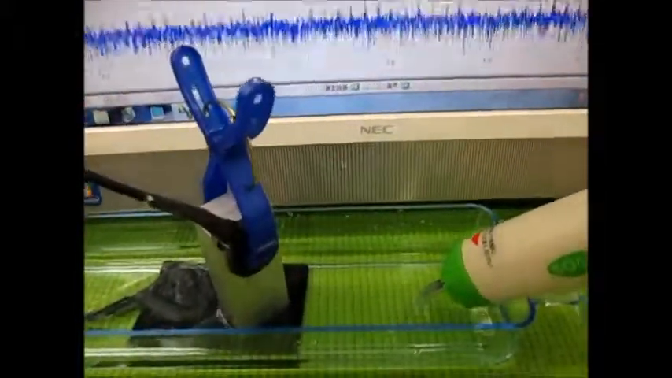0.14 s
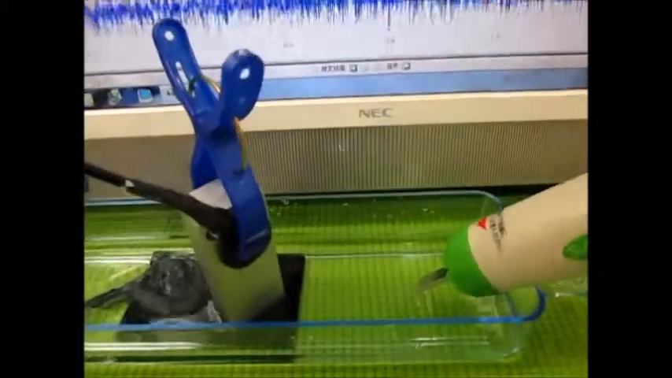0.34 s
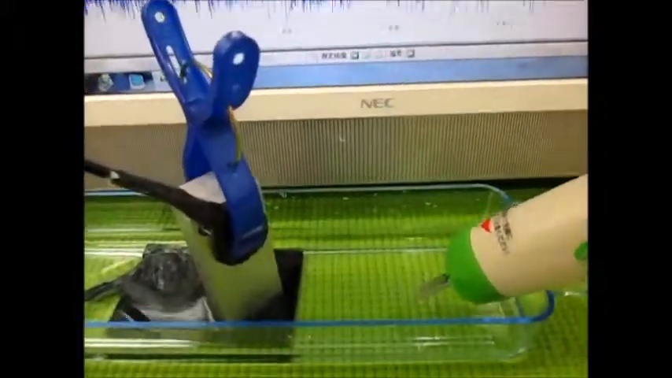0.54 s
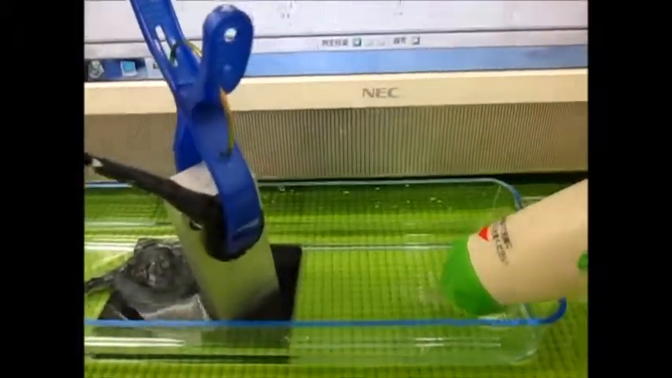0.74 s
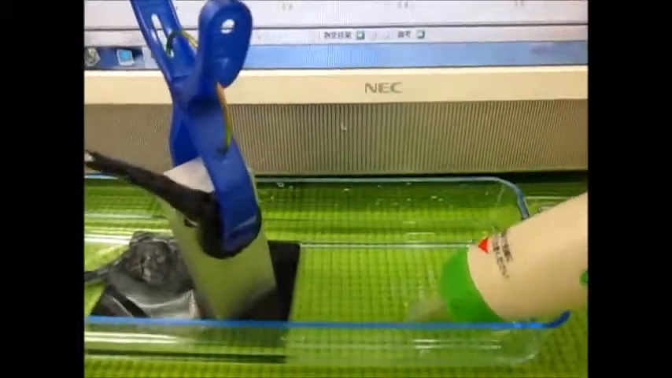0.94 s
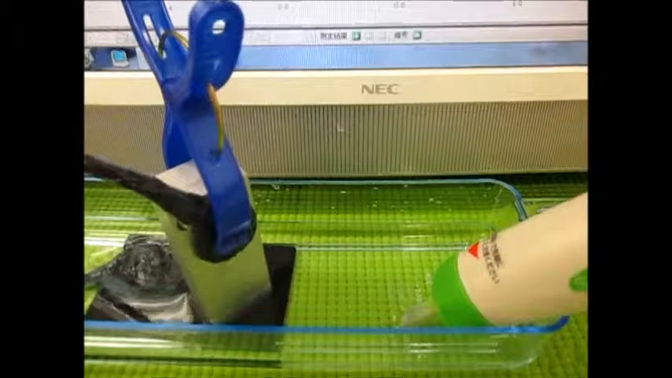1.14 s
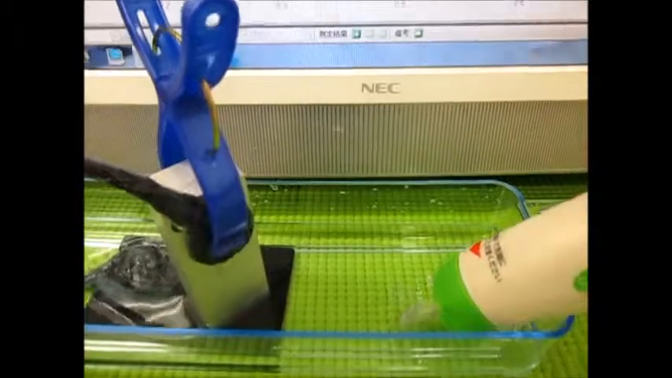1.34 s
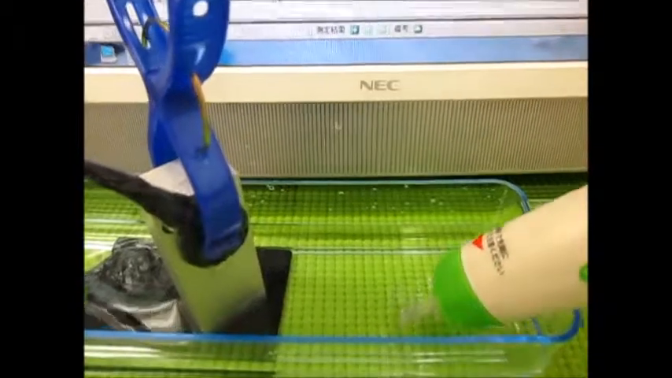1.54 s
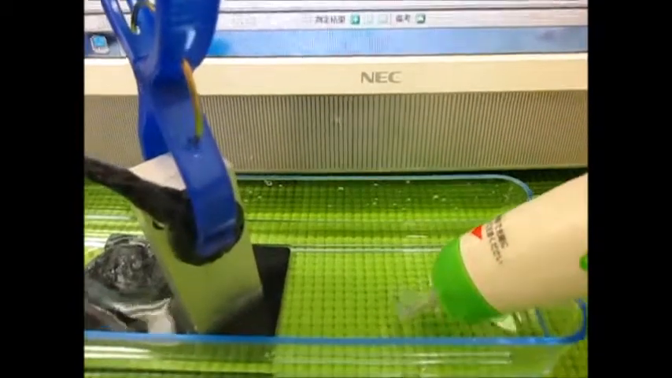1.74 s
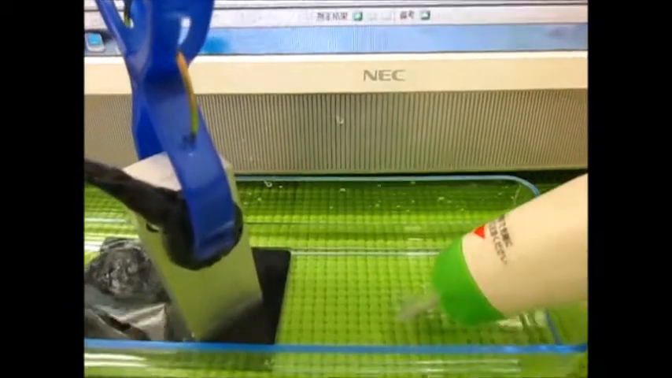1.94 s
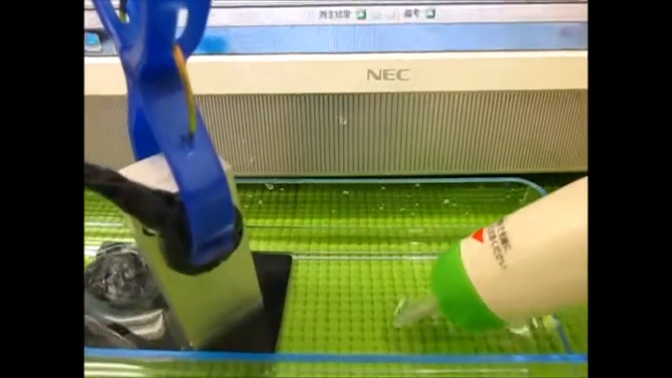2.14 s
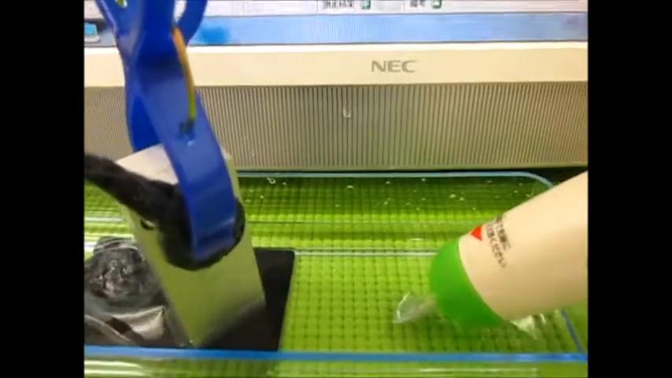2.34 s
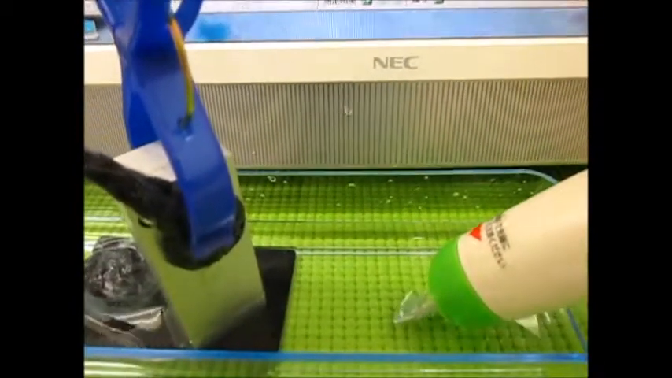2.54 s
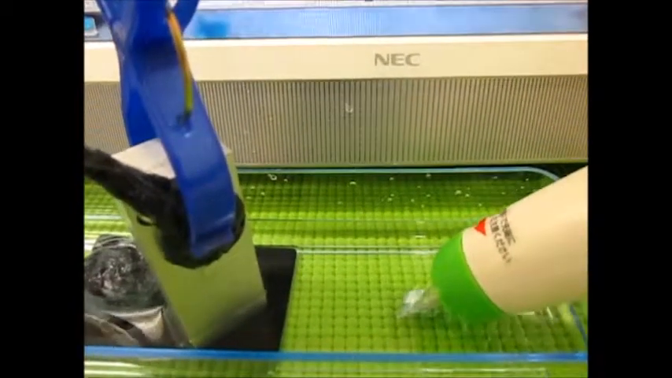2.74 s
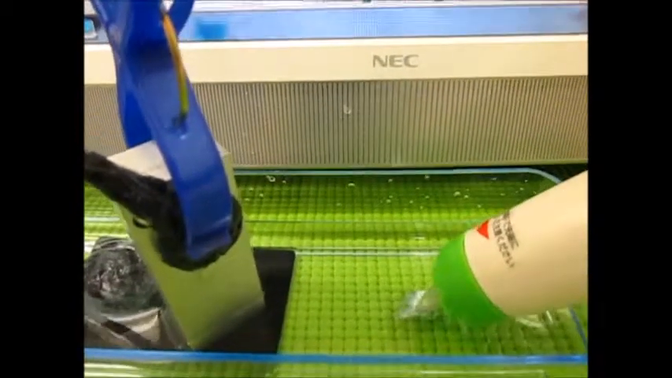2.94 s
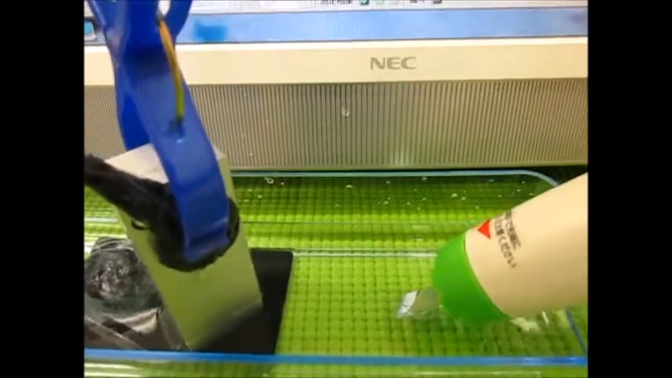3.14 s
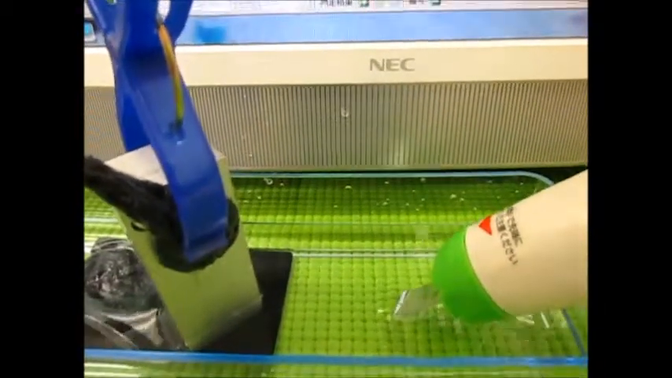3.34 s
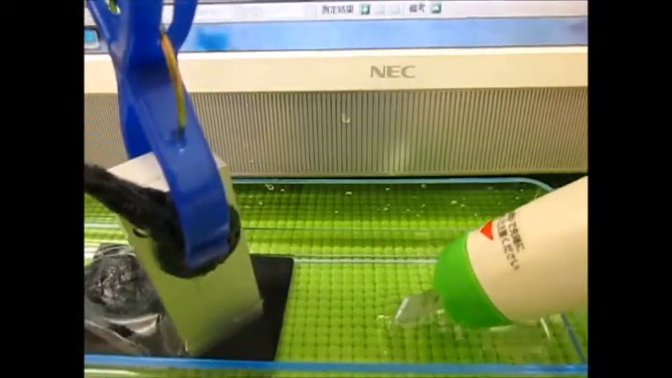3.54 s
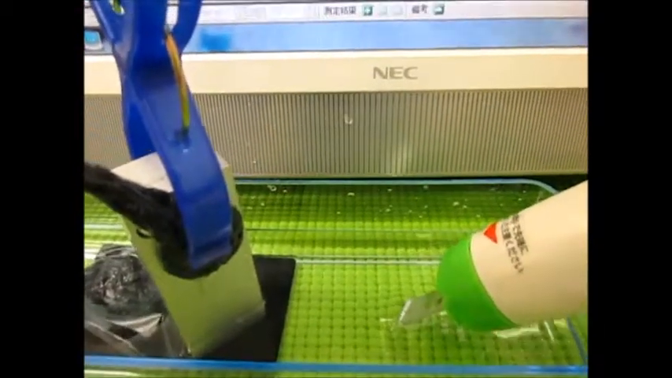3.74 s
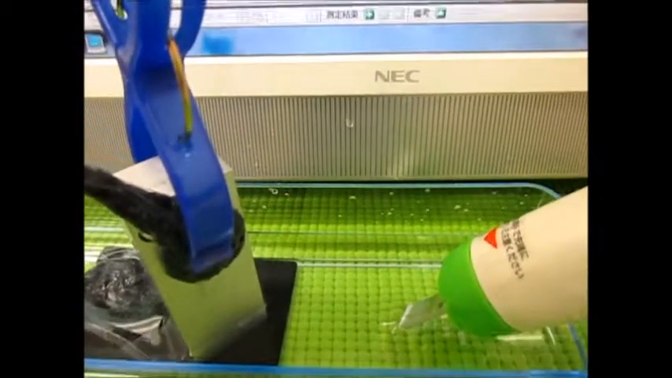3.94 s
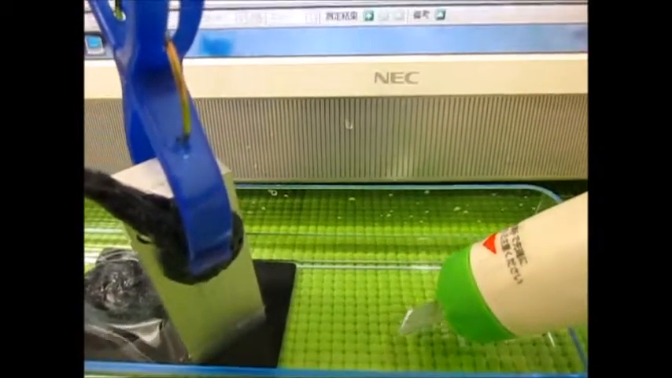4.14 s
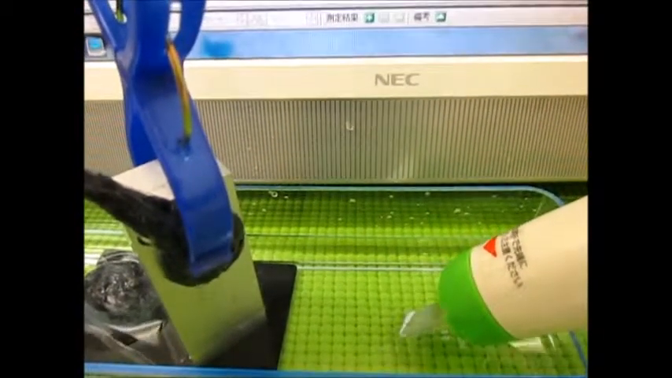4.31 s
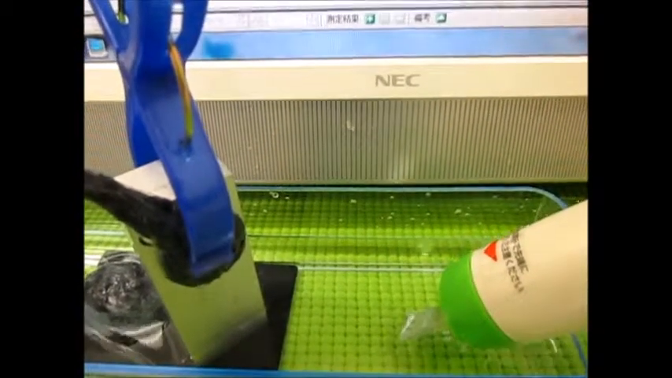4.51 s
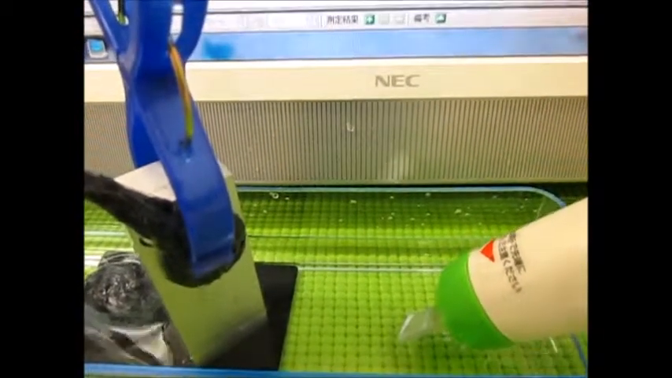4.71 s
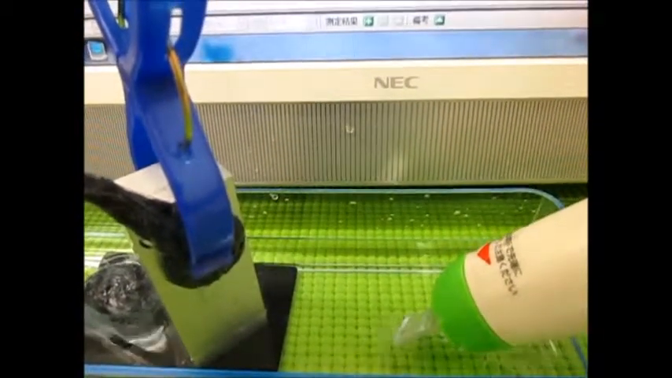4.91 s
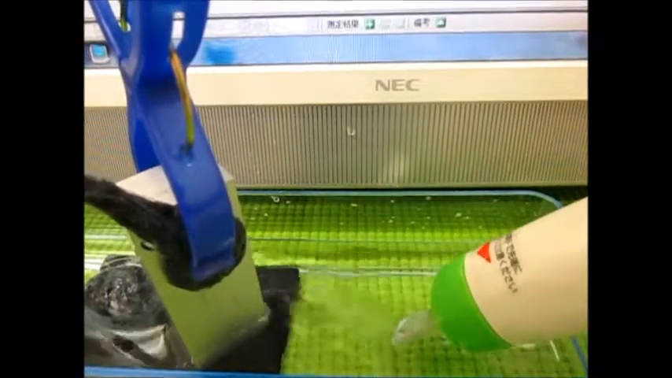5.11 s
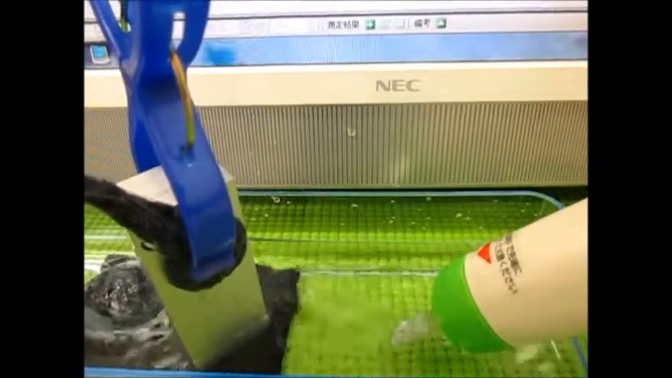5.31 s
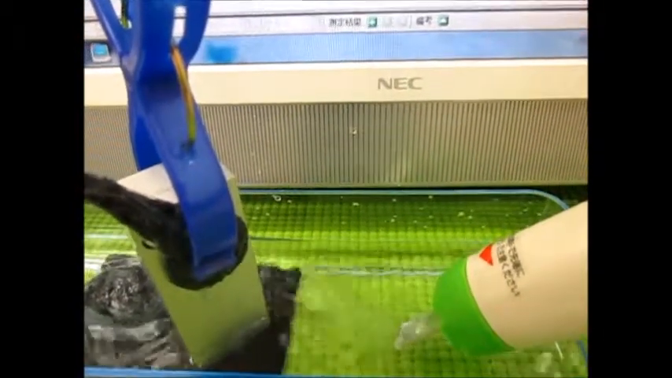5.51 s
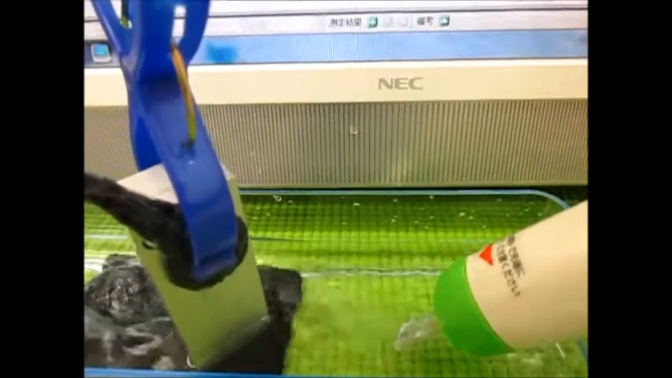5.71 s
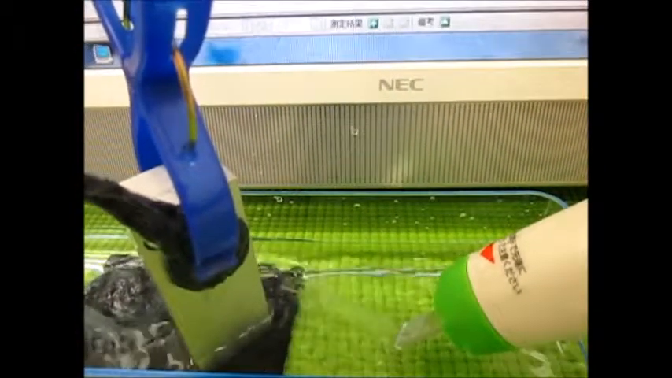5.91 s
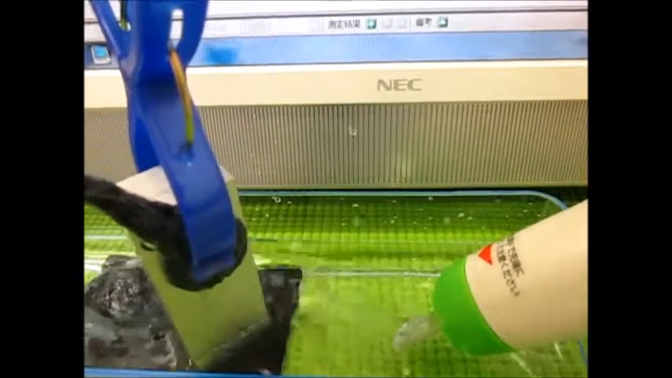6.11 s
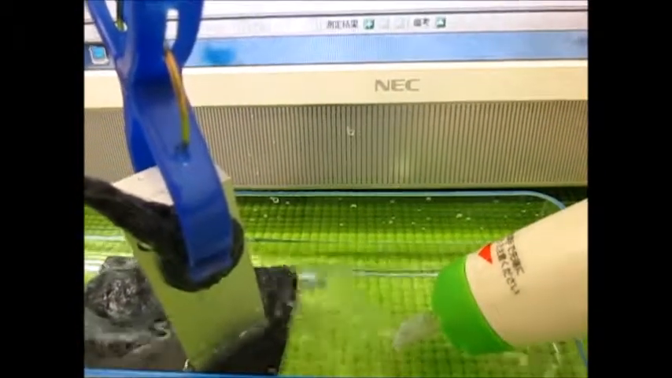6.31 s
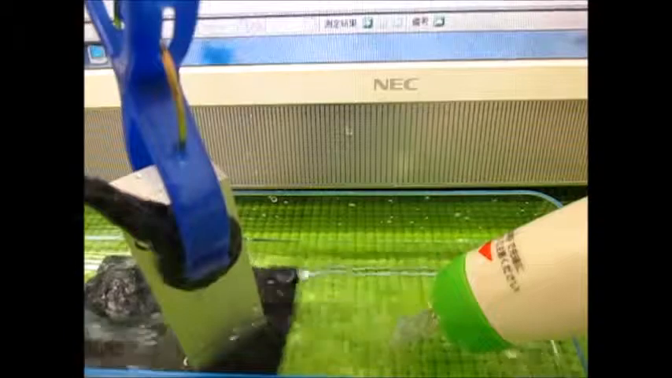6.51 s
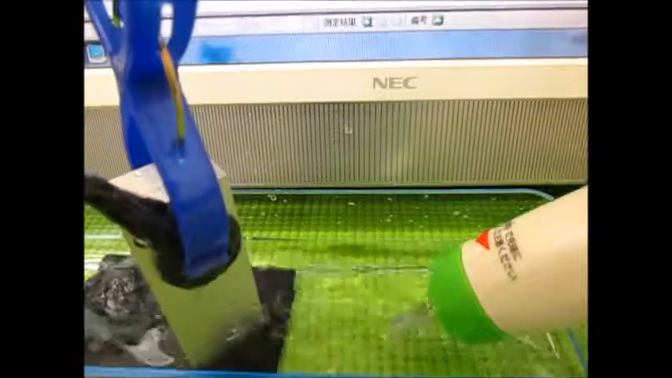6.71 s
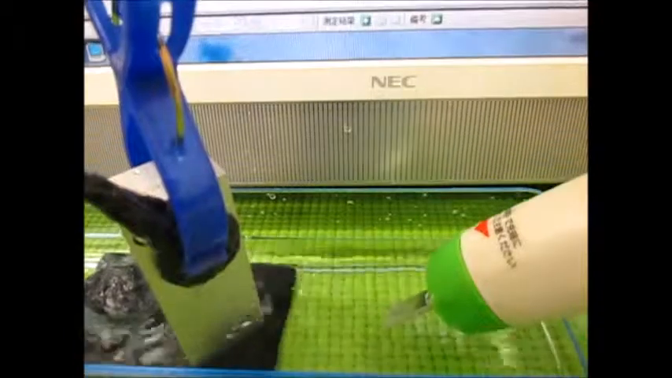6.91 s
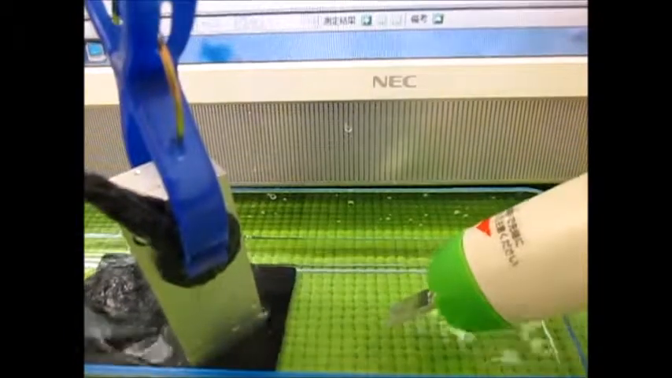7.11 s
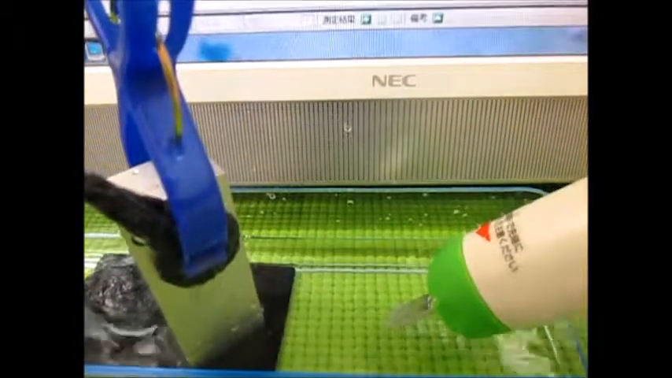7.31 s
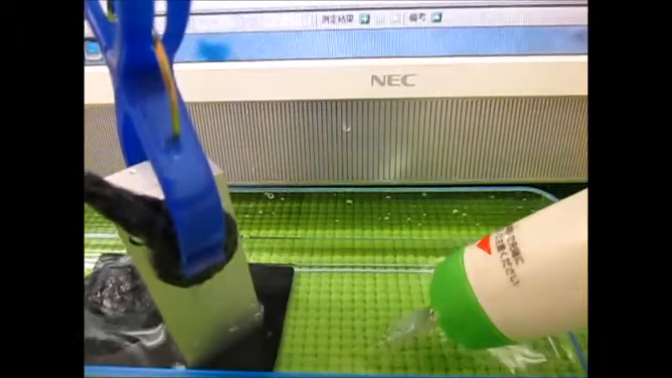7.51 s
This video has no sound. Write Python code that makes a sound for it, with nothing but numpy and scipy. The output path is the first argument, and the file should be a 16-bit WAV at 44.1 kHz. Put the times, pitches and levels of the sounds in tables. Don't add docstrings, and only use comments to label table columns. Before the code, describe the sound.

In a small hard lab, soft ventilation rumble and a wavering low hum run throughout. Dull knocks come from a bench across the room, with one loud plastic snap close by. Fingers rustle and creak on a plastic grip near the microphone. A switch clicks and a harsh, bright, bubbly hiss bursts into a shallow water tray, weakens after a second, and stops abruptly with another click.

```python
import sys
import numpy as np
from scipy import signal
from scipy.fft import rfft, irfft, dct, next_fast_len
from scipy.io import wavfile
from scipy.ndimage import uniform_filter1d

SR = 44100
rng = np.random.default_rng(int(sys.argv[2]) if len(sys.argv) > 2 else 0)


def ratio(d):
    e = np.asarray(d, float) / 20
    return 10 ** e


def digitize_waveform(pressure):
    field = np.atleast_2d(pressure).T
    bounded = np.clip(field, -1, 1)
    quanta = np.round(bounded * 32767).astype(np.int16)
    wavfile.write(sys.argv[1], SR, quanta)


N = 333396
T = np.arange(N) / SR


def unit(x):
    return x / np.sqrt(np.mean(x ** 2))


def curve(rows, order=1):
    rows = np.array(rows)
    return np.interp(T, rows[:, 0], rows[:, order], left=-150, right=-150)


def band(x, hz, width_hz):
    return signal.lfilter(*signal.iirpeak(min(hz, .45 * SR), hz / width_hz, fs=SR), x)


def coloured(shape):
    hz, db = np.transpose(shape)
    f = np.maximum(np.arange(N // 2 + 1) * SR / N, 1)
    gain = ratio(np.interp(np.log(f), np.log(hz), db))
    return irfft(rfft(rng.standard_normal(N)) * gain, N)


def walk(rate):
    k = max(int(SR / rate), 1)
    held = np.repeat(rng.standard_normal(N // k + 1), k)
    return unit(uniform_filter1d(uniform_filter1d(held, k), k)[:N])


def ring(hz, t60, rise_s=0.00033):
    t = np.arange(SR // 10) / SR
    return (1 - np.exp(-t / rise_s)) * ratio(-60 * t / t60) * np.sin(2 * np.pi * hz * t)


def burst(t60):
    return rng.standard_normal(SR // 10) * ratio(-60 * np.arange(SR // 10) / SR / t60)


def add(out, s, hit, db):
    i = int(s * SR)
    out[i:i + len(hit)] += ratio(db) * hit / np.abs(hit).max()


# frequency in Hz, density in dB per Hz.
AIR = [(12, -51), (20, -0.5), (41, -6), (81, -6.5), (123, -3.5), (276, -4.5), (317, -5), (355, -9.5),
       (469, -12), (554, -11.5), (603, -14.5), (1080, -18), (1510, -23), (2450, -27), (3300, -33),
       (15800, -52)]
# time in seconds, level in dB.
HUM = [(0.0, -61), (1.2, -54), (1.47, -62), (1.68, -51.5), (3.05, -49), (4.2, -49), (5.6, -52), (5.9, -54),
       (7.56, -57.5)]


def lab():
    air = coloured(AIR)
    mids = signal.butter(4, [150, 900], "band", fs=SR, output="sos")
    air /= np.std(signal.sosfilt(mids, air))
    bass = band(band(rng.standard_normal(N), 30, 30), 30, 30)
    rumble = ratio(-63.5 + 5.1 * walk(3.9)) * unit(bass)
    hum = np.sqrt(2) * np.sin(2 * np.pi * 120.5 * T + .8 * walk(12))
    hum = ratio(curve(HUM) - 1.5 + 2.6 * walk(14)) * hum
    return ratio(-47.5 + 0.72 * walk(10)) * air + rumble + hum


ECHO_S, ECHO_DB = .0105, -12

# start in seconds, peak in dB, low mode in Hz, relative level of the upper modes in dB.
KNOCKS = [
    (0.159, -21, 700, -18),
    (0.324, -28.5, 444, -20),
    (0.985, -30, 490, -28),
    (1.456, -30, 474, -23.5),
    (1.883, -40, 697, -24),
    (2.064, -23, 409, -21),
    (2.426, -27.5, 405, -23),
    (2.738, -25.5, 415, -26),
]
# frequency in Hz, level in dB, 60 dB decay in seconds.
BENCH = [(436, 10, 0.026), (580, -1, 0.014), (687, 14, 0.013), (940, -18, 0.022), (1260, -17, 0.024),
         (1420, -5, 0.034), (1664, -5, 0.039), (2050, -10, 0.024), (2720, -6, 0.0053)]


def knocks():
    thud_lag_s, tick_lead_s = .0016, .0007
    out = np.zeros(N)
    chance = rng.standard_normal((len(KNOCKS), len(BENCH)))
    for (s, db, hz, upper_db), own in zip(KNOCKS, chance):
        hit = 0.49 * ring(hz, 0.034, 0.0037) + ratio(upper_db - 2.5) * band(burst(0.028), 3000, 5000)
        for (f, g_db, t60), c in zip(BENCH, own):
            mode = ring(f * (1 + 0.056 * c), t60, 0.62 / f)
            mode = np.roll(mode, int(thud_lag_s * SR) * (f < 1000))
            hit += ratio(g_db + 1.5 * c + (upper_db + 19.5) * (f > 1000)) * mode
        add(out, s - tick_lead_s, hit, db)
        add(out, s + ECHO_S, hit, db + ECHO_DB)
    return out


# start in seconds, peak in dB, crack level relative in dB.
CLICKS = [
    (1.185, -33.5, -30),
    (1.2095, -8.5, -29),
    (4.3687, -20.5, -23),
    (4.9358, -8.5, -22),
    (6.7483, -15.5, -30),
]
# frequency in Hz, level in dB, 60 dB decay in seconds.
SHELL = [
    [(1040, -2, 0.056), (1720, -3, 0.039), (2680, -15, .02), (6300, -20, .012)],
    [(2440, 1.5, 0.009), (2880, 2.5, 0.0076), (3460, 5, 0.007), (3760, -3, 0.0067), (4460, -11.5, 0.0093),
     (5070, -14, 0.013), (6500, 7.5, 0.0023), (7680, -10, 0.0098)],
    [(496, -2, 0.016), (1040, -8, 0.017), (1750, 2, 0.015), (2270, -4, .008), (2950, -4, 0.0091),
     (3550, -11, 0.0087), (4320, -1, 0.0096), (6000, -16, 0.01), (11400, -30, .012)],
    [(1650, -8.5, 0.0079), (2600, -4.5, 0.0095), (3450, -4, 0.0117), (4250, -6, 0.0064), (4960, -6.5, .012),
     (6400, -12.5, 0.0078)],
    [(406, 2, 0.0097), (1080, -1.5, 0.011), (1620, 0.5, 0.013), (2230, -2, 0.012), (3000, -6, 0.008),
     (4250, 1.5, 0.0091)],
]
# start in seconds, peak in dB, centre in Hz, width in Hz.
TICKS = [
    (1.2745, -43, 11000, 9000),
    (2.618, -42.5, 12400, 4500),
    (3.428, -51, 11000, 12000),
    (3.435, -50, 11000, 6000),
    (3.458, -42.5, 10000, 12000),
    (3.5, -44.5, 11000, 11000),
    (3.575, -49, 7050, 6950),
    (4.3464, -55, 12500, 8000),
    (4.452, -54, 4670, 4000),
]


def clicks():
    out = np.zeros(N)
    for (s, db, crack_db), modes in zip(CLICKS, SHELL):
        hit = 0
        for k, (hz, g_db, t60) in enumerate(modes):
            hit = hit + (-1) ** k * ratio(g_db) * ring(hz, 0.65 * t60, 0.00059)
        chatter = np.convolve(hit, burst(0.019)[:300])[:len(hit)] / 4
        add(out, s, hit + 0.25 * chatter, db)
        echo = np.convolve(hit, burst(0.15)[:3600])[:SR // 10]
        add(out, s + ECHO_S, echo, db - 28.5)
        crack = burst(0.013) + .12 * burst(.07)
        add(out, s, band(band(crack, 9300, 10000), 9500, 9000), db + crack_db)
    for s, db, hz, width_hz in TICKS:
        add(out, s, band(band(burst(0.028), hz, width_hz), hz, width_hz), db)
    add(out, TICKS[0][0], ring(14100, .035), -51)
    return out


def stroke(s, length_s, edge_s):
    return np.clip(np.minimum(T - s, s + length_s - T) / edge_s + .5, 0, 1)


# start in seconds, length in seconds, peak in dB, centre in Hz, width in Hz.
SLIDES = [
    (2.1, 1.33, -74, 10400, 9000),
    (2.6, 0.36, -82, 9900, 400),
    (3.3, 1.28, -73, 7600, 6000),
    (4.38, 0.17, -61.5, 4400, 2800),
]
# start in seconds, length in seconds, level in dB.
CREAKS = [
    (3.523, 0.049, -65),
    (3.572, .04, -59),
    (3.635, 0.083, -62.5),
    (3.72, .19, -61.5),
    (3.94, .033, -63),
    (4.044, 0.032, -63),
]
# frequency in Hz, width in Hz, level in dB.
GRIP = [(4600, 300, -9), (6710, 150, -5), (9570, 170, -1), (11600, 200, -8), (12300, 200, -3),
        (14300, 280, 1)]


def hand():
    chance = 300 / SR * ratio(5 * walk(40))
    slips = (rng.random(N) < chance) * ratio(1.5 * rng.standard_normal(N))
    slips = slips + .05 * rng.standard_normal(N)
    creak = sum(ratio(db) * band(slips, hz, w) for hz, w, db in GRIP)
    creak = creak + ratio(-12) * band(slips, 10000, 11000)
    out = sum(ratio(db) * stroke(s, length_s, .008) for s, length_s, db in CREAKS) * unit(creak)
    for s, length_s, db, hz, width_hz in SLIDES:
        swell = np.sin(np.pi * np.clip((T - s) / length_s, 0, 1)) ** 2
        rustle = band(band(rng.standard_normal(N), hz, width_hz), hz, width_hz)
        out += swell * ratio(db + 2.4 * walk(50)) * unit(rustle)
    return out


# centre in seconds, half length in seconds, depth in dB.
LULLS = [
    (5.37, 0.13, 2.5),
    (5.655, 0.1, 2),
    (5.875, 0.025, 0),
    (6.17, 0.28, 3),
    (6.585, 0.029, 6),
]


def lulls_db():
    return sum(db * np.exp(-((T - s) / half_s) ** 2) for s, half_s, db in LULLS)


SAG_FROM_S = 6.08


def flow():
    on_s, off_s, bite_s = 5.004, 6.7402, 0.0042
    since = np.maximum(T - on_s, 0)
    db = -15.5 - 7 * np.maximum(T - SAG_FROM_S, 0) - lulls_db()
    db -= 2500 * np.maximum(T - off_s, 0)
    return ratio(db + .8) * (T > on_s) * (1 + .3 * np.exp(-since / bite_s))


# frequency in Hz, density in dB per Hz.
SPLASH = [(500, -23), (1800.0, -21.5), (2770.0, -26.5), (4270.0, -16), (6580.0, -4), (10130.0, -0.5),
          (15600.0, -4)]
# frequency in Hz, width in Hz, gain in dB.
HORN = [(2670.0, 180.0, 11.8), (3010.0, 230.0, -5.6), (3300.0, 890.0, 12.7), (3720.0, 130.0, -9.9),
        (4720.0, 760.0, 3.7), (5170.0, 260.0, -10.0), (5700.0, 160.0, 6.6), (6190.0, 380.0, -11.1),
        (6430.0, 330.0, 8.0), (7050.0, 250.0, -5.0), (7720.0, 480.0, -6.2), (8200.0, 100.0, 3.7),
        (9020.0, 470.0, -14.0), (9390.0, 300.0, 6.5), (10700.0, 900.0, 7.7), (11110.0, 290.0, -3.3),
        (11590.0, 720.0, 5.8), (12020.0, 220.0, -6.8), (12230.0, 900.0, 10.0), (12810.0, 250.0, -10.1),
        (13380.0, 250.0, 5.2), (13680.0, 160.0, -11.7), (13900.0, 560.0, 10.3), (14410.0, 80.0, -5.5),
        (14560.0, 140.0, 2.2), (14930.0, 160.0, -7.7), (15320.0, 450.0, -6.9)]


def jet():
    bubbles = rng.standard_normal(N) * ratio(2.0 * walk(700) + .25 * walk(40))
    size = next_fast_len(N)
    f = np.maximum(np.arange(size // 2 + 1) * SR / size, 1)
    splash_hz, splash_db = np.transpose(SPLASH)
    db = np.interp(np.log(f), np.log(splash_hz), splash_db, left=-60)
    db += sum(g_db / (1 + (2 * (f - hz) / w) ** 2) for hz, w, g_db in HORN)
    rung = rfft(bubbles, size) * ratio(db)
    out, scale, lulls = 0, np.std(irfft(rung)), lulls_db()
    for hz in np.arange(0, 17000, 1500):
        share = np.cos(np.pi / 2 * np.clip((f - hz) / 1500, -1, 1)) ** 2
        level_db = (0.18 + 0.18 * lulls) * np.clip((10500 - hz) / 3000, 0, 1)
        level_db += 10 * np.maximum(T - SAG_FROM_S, 0) * (hz > 14000)
        flicker_db = 0.44 * walk(9) + .7 * walk(35)
        out = out + ratio(level_db + flicker_db) * irfft(rung * share, size)[:N]
    return flow() * out / scale


def room(x, wet_db):
    t = np.arange(SR // 2) / SR
    dull, bright = rng.standard_normal((2, len(t)))
    tail = band(dull, 1400, 2700) * ratio(-60 * t / 0.17) + 0.91 * bright * ratio(-60 * t / .09)
    tail *= t > .006
    return x + ratio(wet_db) * signal.fftconvolve(x, tail / np.linalg.norm(tail))[:N]


def scene():
    near = room(jet() + hand(), -15) + room(clicks(), -23)
    return (near + room(knocks(), -9.5) + lab())[None]


# centre in seconds, length in seconds, level in dB below which
# spectral lines get sparse, frequency in Hz below which they are spared.
THINNED = [(0.08, 0.025, -63, 3000), (0.757, 0.025, -55, 3000), (1.889, .036, -60, 3000),
           (2.682, 0.033, -62.5, 3000), (3.4873, 0.045, -66, 3000), (3.594, 0.028, -55, 3000),
           (3.7558, 0.075, -46, 3000), (3.8951, .036, -58, 2500), (4.155, 0.022, -53, 3000),
           (4.383, 0.026, -25, 6500), (4.4713, .032, -70, 6000), (5.1113, .036, -36, 600),
           (5.7513, 0.036, -33, 300), (6.207, 0.042, -35, 300), (6.4551, 0.034, -36, 300)]


def thin_out(x):
    out = x.copy()
    for s, length_s, db, spared_hz in THINNED:
        count = int(length_s * SR)
        window = np.sin(np.pi * np.arange(count) / count)
        i = int(s * SR) - count // 2
        lines = dct(x[i:i + count] * window, norm="ortho")
        local = np.sqrt(uniform_filter1d(lines ** 2, size=120) + 1e-18)
        hz = np.arange(count) / (2 * length_s)
        spare = np.clip(hz / spared_hz, .05, 1) ** 2
        step = 4.5 * ratio(db) * (local / ratio(db)) ** .8 * spare
        change = np.round(lines / step) * step - lines
        out[i:i + count] += window * dct(change, type=3, norm="ortho")
    return out


def band_limit(x):
    return signal.sosfilt(signal.butter(12, 16360, fs=SR, output="sos"), x)


def record(dry):
    lines = rfft(dry[0] - .9 * band(dry[0], 7850, 110))
    edge = np.clip((np.arange(len(lines)) * SR / N - 15700) / 110, 0, 1)
    x = irfft(lines * np.cos(np.pi / 2 * edge) ** 2, N)
    return band_limit(thin_out(x)[None])


dry = scene()
out = record(dry)
digitize_waveform(out)
```